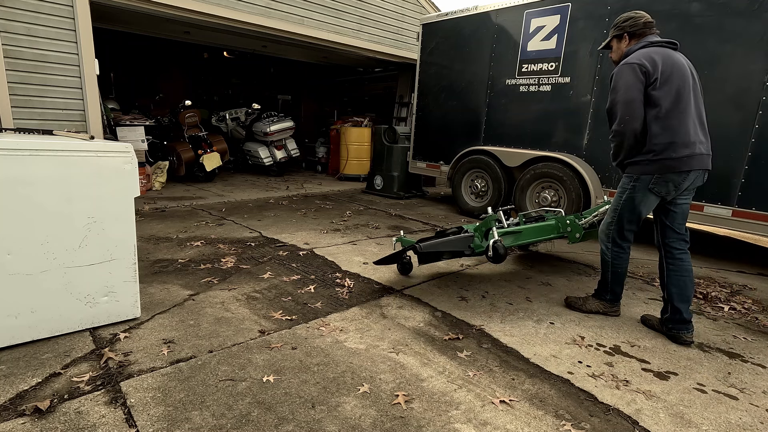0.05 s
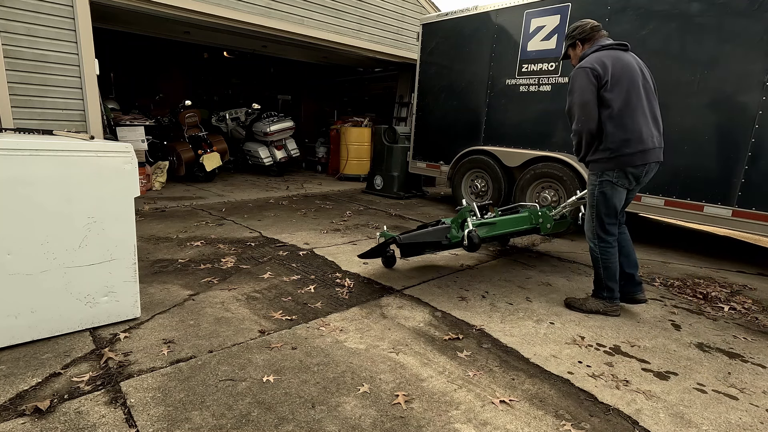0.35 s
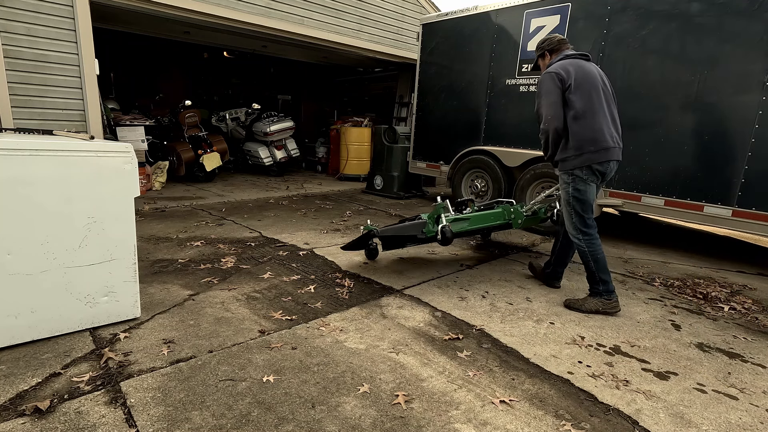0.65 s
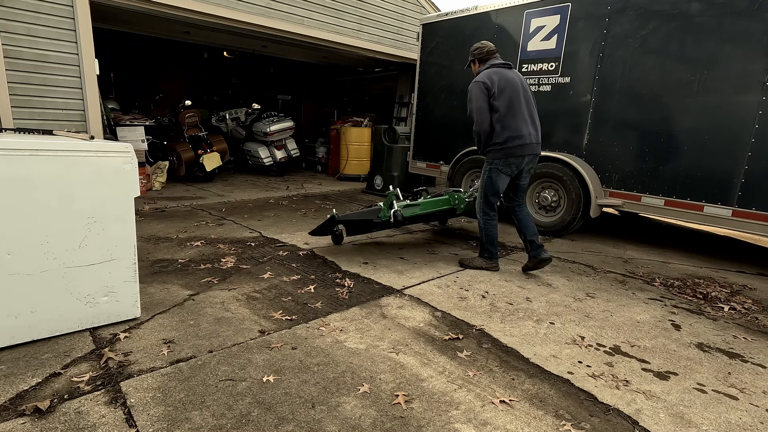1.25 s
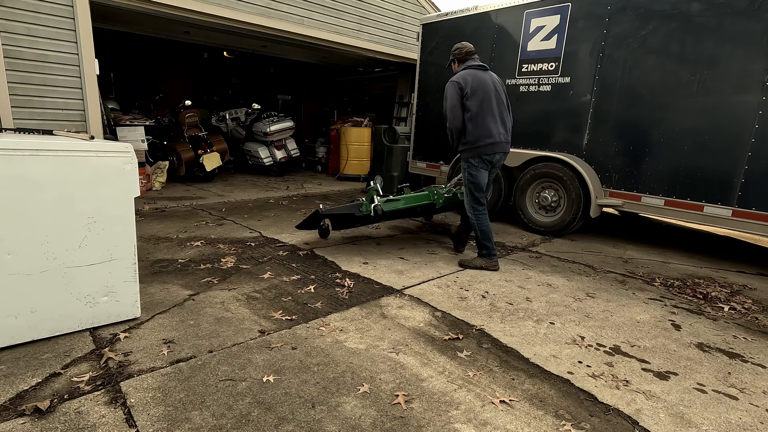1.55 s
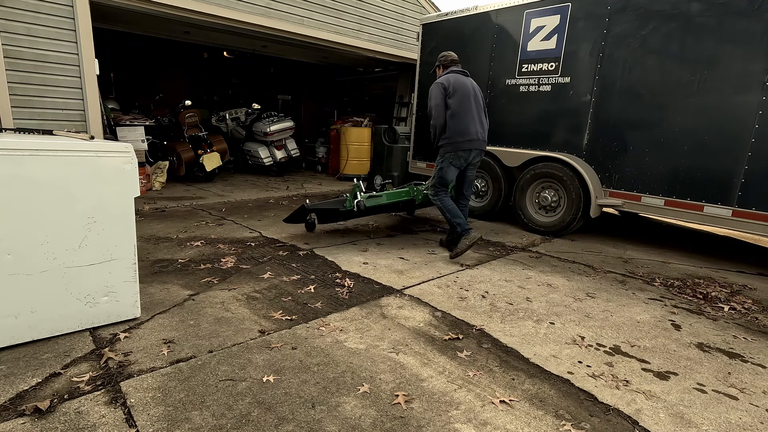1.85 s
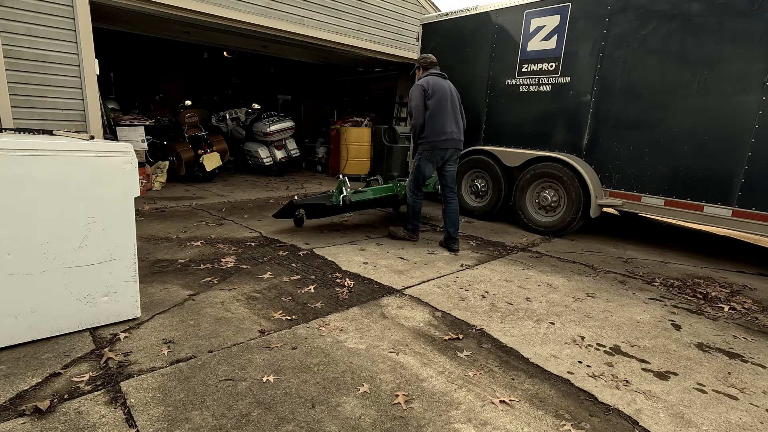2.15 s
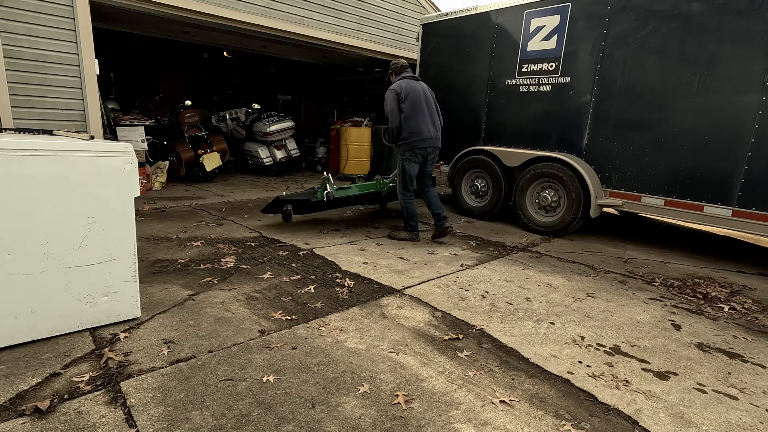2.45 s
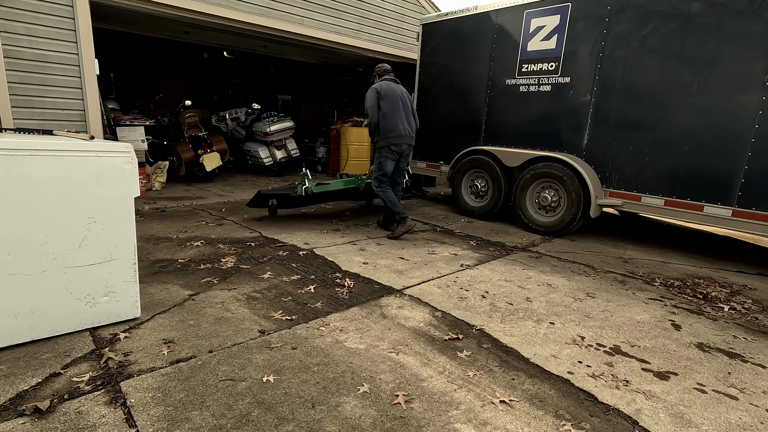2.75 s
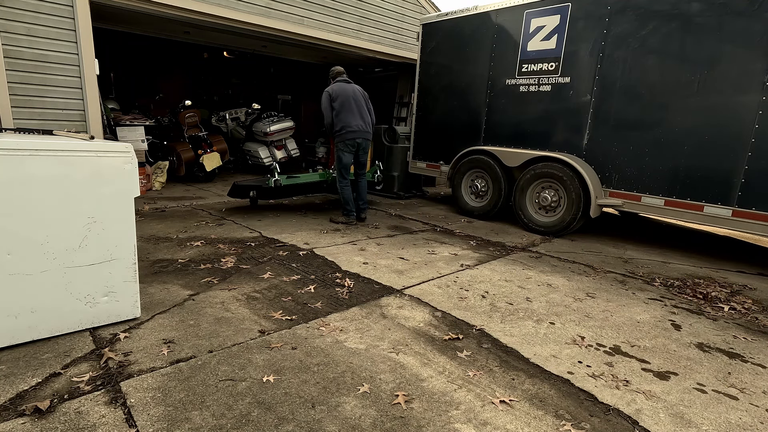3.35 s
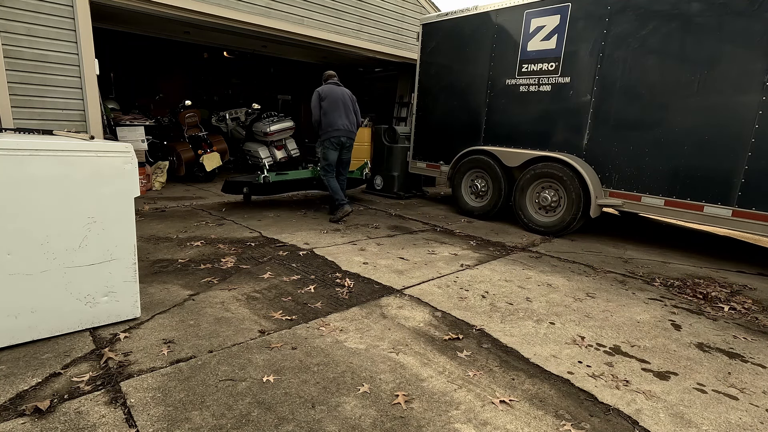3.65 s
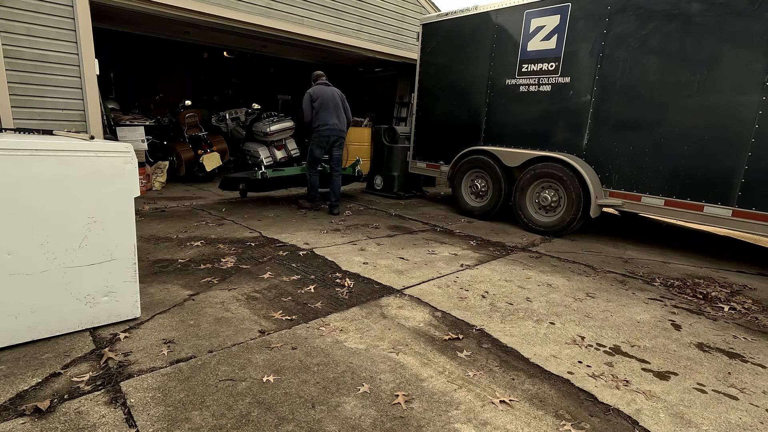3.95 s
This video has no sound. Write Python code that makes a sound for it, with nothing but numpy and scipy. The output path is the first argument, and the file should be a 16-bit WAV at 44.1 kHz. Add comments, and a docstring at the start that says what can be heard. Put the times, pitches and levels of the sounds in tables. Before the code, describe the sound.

A wheeled metal frame is pushed over rough concrete outside a garage. Loose parts knock, the wheels build to a rattling rumble with loud clatters at cracks, and shoes scuff lightly before one last heavy jolt, all with slight echo.

```python
"""A steel frame on small hard wheels is pushed over a rough concrete driveway into a garage.
Loose parts knock first; then grit under the wheels builds to a drumming that keeps the joints rattling.
Near 0.4, 1.4 and 1.85 s the wheels hit cracks and the whole frame clatters. A calmer stretch follows,
with knocks, wheel clonks and shoe scuffs, until a last heavy jolt at 3.9 s.
Throughout, the garage front answers, and a low hum and outdoor air lie underneath."""
import sys
import numpy as np
from scipy import signal
from scipy.fft import rfft, irfft, next_fast_len
from scipy.io import wavfile
from scipy.ndimage import map_coordinates

SR = 44100
rng = np.random.default_rng(int(sys.argv[2]) if len(sys.argv) > 2 else 0)


def waveform_to_disk(signal):
    """Save audio, clipped to [-1, 1], as 16-bit WAV at the path in sys.argv[1]."""
    frames = np.transpose(np.atleast_2d(signal))
    scaled = np.clip(frames, -1, 1) * 32767
    samples = np.round(scaled).astype(np.int16)
    wavfile.write(sys.argv[1], SR, samples)


N = 176400

# fader rides for the wheels' drumming and the rattling joints (t/s, level/dB)
ROLL_RIDE = [(0, -50), (.33, -38.5), (.55, -32.5), (.68, -26.5), (.88, -33), (.98, -32), (1.12, -37),
             (1.3, -28), (1.62, -31), (1.95, -29.5), (2.1, -32.5), (2.44, -34), (2.8, -31), (3.25, -31),
             (3.42, -33), (3.6, -31), (3.85, -34.5)]
RATTLE_RIDE = [(0, -38), (.34, -42), (.52, -38), (.72, -33.5), (.84, -35.5), (.9, -45.5), (1.05, -39),
               (1.11, -44.5), (1.21, -45), (1.3, -29), (1.58, -40.5), (1.74, -34), (1.97, -36),
               (2.13, -37.5), (2.58, -39), (2.8, -34), (3.0, -37.5), (3.35, -35.5), (3.42, -41.5),
               (3.55, -32), (3.72, -42), (3.84, -40.5)]
# wheels jolting through cracks (t/s, length/s, rumble/dB, relative clatter/dB)
CRACKS = [(0.389, 0.023, -21, -27), (0.434, 0.012, -20, -22.5), (0.462, 0.015, -30, -24),
          (0.476, 0.035, -22.5, -36), (0.592, 0.017, -20.5, -29), (0.721, 0.0053, -39, -26),
          (0.755, 0.013, -34, -38), (0.939, 0.028, -28, -33.5), (1.231, 0.043, -30, -30.5),
          (1.361, 0.01, -18, -26), (1.384, 0.018, -25, -14.5), (1.404, 0.048, -20, -20),
          (1.454, 0.042, -22.5, -21), (1.836, 0.019, -20.5, -20), (1.857, 0.017, -20, -16.5),
          (1.893, 0.033, -29, -31.5), (2.894, 0.062, -24.5, -36), (3.053, 0.036, -29, -38.5),
          (3.15, 0.01, -31.5, -27), (3.22, 0.039, -28.5, -35), (3.506, 0.03, -25, -36),
          (3.681, 0.037, -27, -33), (3.894, 0.034, -16.5, -19), (3.917, 0.029, -17.5, -16),
          (3.969, .04, -14, -15.5)]
# tone of the frame's deep voice (f/Hz, gain/dB)
FRAME_EQ = [(25, -23), (50, -51), (80, -10.5), (100, -9), (125, -2.5), (165, -7.5), (235, 2.5), (305, -6.5),
            (390, -2.5), (490, 3), (620, -5), (900, -9), (1400, -24.5), (3000, -72)]
# tone of the steel joints (f/Hz, gain/dB)
JOINT_EQ = [(200, -10.5), (600, -3.5), (1050, 0.5), (1450, 1.5), (1670, -3), (1900, -0.5), (2800, -0.5),
            (3700, -3.5), (4400, -9), (5500, -15), (7000, -21.5), (8200, -40), (10500, -31)]
# ringing modes of the frame, and of the small pins on it (f/Hz, relative level/dB, t60/s)
FRAME_MODES = [(230.7, 4.5, 0.066), (385.8, 9.5, 0.43), (540, 10, 0.42), (594.7, 9.5, 0.12),
               (751.5, 11, 0.069), (1035, 7, 0.3), (1307, 13, 0.18), (1645, 16, 0.096), (1720, 10, 0.084),
               (2167, 11, 0.26), (2300, -6, 0.2), (2523, 1, 0.073), (3800, -9, 0.064), (4060, 9, 0.044)]
PIN_MODES = [(1727, 3.5, 0.03), (1990, 4, 0.026), (2680, 2.5, 0.043), (2920, -22, 0.019),
             (3560, 0.5, 0.067), (3760, -9.5, 0.067), (6300, -36, 0.04)]
# decay of the noisy snap of one contact (f/Hz, t60/s)
CONTACT_DECAY = [(100, 0.06), (500, 0.052), (1500, 0.047), (6000, 0.034)]
# single knocks of loose parts (t/s, thud/dB, body/dB, clank/dB, tick/dB)
KNOCKS = [(.005, -40, -31.5, -28.5, -29), (.068, -27, -28, -22.5, -25), (.089, -59, -52, -29, -30),
          (0.155, -36, -36, -34.5, -29), (0.202, -29.5, -27, -26, -34), (.292, -23.5, -29.5, -29, -27.5),
          (0.378, -30, -19, -23, -29), (.504, -32, -23, -28, -49), (.594, -40, -35, -19.5, -25),
          (.761, -30, -18.5, -26, -31), (0.88, -27, -49, -54, -52), (0.962, -19, -25.5, -33.5, -31.5),
          (1.012, -26, -21, -28, -33), (1.035, -21.5, -26.5, -30.5, -34.5), (1.172, -23, -23, -28.5, -32),
          (1.316, -16.5, -21.5, -27, -27), (1.637, -45, -25, -28, -33), (1.68, -33, -26, -26, -25),
          (1.788, -34, -22, -25.5, -22), (1.981, -29, -23.5, -27.5, -61), (2.115, -34, -39, -31.5, -37),
          (2.211, -24.5, -21.5, -30.5, -37), (2.245, -39, -41, -28, -34), (2.296, -46, -25, -29, -31.5),
          (2.329, -48, -25.5, -27, -33), (2.537, -30, -26.5, -33, -54), (2.778, -27.5, -31, -27, -59),
          (2.892, -37, -35, -33, -35), (2.925, -38, -21, -29, -40), (3.059, -30, -27.5, -27, -32),
          (3.263, -21.5, -28, -37, -29.5), (3.357, -51, -36, -34, -35), (3.53, -37, -24, -41, -38),
          (3.9, -16, -19, -39, -49)]
# tone of a knock's thud, body and clank (f/Hz, gain/dB)
THUD_EQ = [(50, -34), (110, -6), (230, 13.5), (330, -9), (700, -19.5), (2000, -70)]
BODY_EQ = [(150, -40), (330, -13), (520, 1), (700, -4.5), (1100, -8), (3000, -60.5)]
CLANK_EQ = [(400, -35), (1000, -2), (1700, -3), (2800, -2.5), (4000, -16.5), (8000, -44)]
# tone of its tick (f/Hz, gain/dB)
TICK_EQ = [(1200, -37), (2700, -1), (3600, 3), (4500, -5), (6500, -14), (8200, -21), (10500, -9.5)]
# cues for the parts with notes of their own (t/s, relative level/dB)
JOINT_SLAMS = [(.393, -14.5), (.401, -13), (.431, -11.5), (.595, -24.5), (1.389, -21), (1.495, -22),
               (1.847, -23), (1.862, -11), (3.918, -16.5), (3.977, -17)]  # the frame slams on its joints at hard jolts
TUBE_BUMPS = [(1.362, -12.5), (1.392, -12)]  # its hollow tube is bumped
FORK_CLONKS = [(.203, -19), (.506, -23), (1.037, -24.5), (2.537, -23), (2.912, -31), (2.935, -23),
               (3.06, -18.5), (3.111, -24), (3.676, -30)]  # a wheel knocks in its fork
CLIP_CLINKS = [(1.68, -20.5), (1.789, -20)]  # a hanging clip hits the frame
# the notes of those parts (f/Hz, relative level/dB, t60/s)
JOINT_MODES = [(748, -4, 0.15), (998, -6.5, .12), (1215, -3.5, 0.071), (1688, -1.5, 0.11),
               (2055, -5, 0.074), (2600, -1, 0.054), (2924, -6.5, 0.075), (4450, -9, 0.065)]
TUBE_MODES = [(371.5, -1.5, 0.1), (446, -8.5, 0.12)]
FORK_MODES = [(612, 4.5, 0.051), (716, -7, 0.23)]
CLIP_MODES = [(3514, 0, 0.057), (3880, -9, 0.071), (6150, -8.5, 0.042)]
# shoes on the concrete (t/s, length/s, level/dB)
SCUFFS = [(.22, .06, -36), (0.426, 0.011, -25), (0.838, 0.063, -41.5), (0.936, 0.023, -38),
          (1.247, 0.03, -38), (1.28, .002, -32.5), (2.763, 0.057, -38), (3.153, 0.069, -34),
          (3.434, 0.16, -41)]
# tone of a sole (f/Hz, gain/dB)
SOLE_EQ = [(500, -57), (1500, -15), (3200, -1), (4500, 1), (6500, -3), (8000, -10), (10500, 2)]
# decay of the echo off garage and walls (f/Hz, t60/s)
YARD_DECAY = [(120, 1), (500, 0.35), (2000, 0.17), (7000, 0.27)]
# EQ on the echo's stereo side (f/Hz, gain/dB)
SIDE_EQ = [(25, -6), (60, -45), (250, -126), (1000, -21.5), (2500, -20), (5000, -16.5), (8000, -2.5)]
# tone of the outdoor air (f/Hz, gain/dB)
AIR_EQ = [(25, -8), (60, 1.5), (130, 0.5), (500, 0), (2000, -18), (6500, -23.5), (8200, -33),
          (10500, -20.5)]

GRIT_PER_S, RATTLES_PER_S, JOLTS_PER_S, TAPS_PER_PIN_PER_S = 320, 170, 260, 110
JOLT_ATTACK_S, JOLT_RELEASE_S = 0.003, 0.11
CONTACT_RISE_S, STRIKE_RISE_S = 0.00092, 0.00032
PIN_DETUNE, STRIKE_DETUNE = 0.025, 0.015  # fractions of the pitch
JINGLE_DB = -7  # against the rattle ride
KNOCK_S = 0.0076  # a knock's energy equals its level held this long
HUM_HZ, HUM_DB, AIR_DB = 121.2, -43.5, -36.5
LOW_CUT_HZ, TOP_HZ = 81, 11200


def rolling():
    """Grit drums through the wheels and shakes the joints and pins."""
    roll_level = amp(curve(ROLL_RIDE) + 1.4 * wobble(17))
    drumming = shaken(roll_level, GRIT_PER_S, FRAME_EQ, scatter_db=3.7, spots=12)
    rattle_db = curve(RATTLE_RIDE)
    rattle_level = amp(rattle_db + 0.36 * wobble(21.7))
    joints = shaken(rattle_level, RATTLES_PER_S, JOINT_EQ, scatter_db=2.9, spots=10)
    return drumming + joints + jingle(amp(rattle_db + JINGLE_DB))


def cracks():
    """A wheel drops into a crack: the frame rumbles, and its joints and pins chatter hard."""
    shapes = np.array([swell(s, length, JOLT_ATTACK_S, JOLT_RELEASE_S) for s, length, *_ in CRACKS])
    rumble, clatter = (np.max(amp(db)[:, None] * shapes, axis=0) for db in np.transpose(CRACKS)[2:])
    frame = shaken(rumble, JOLTS_PER_S, FRAME_EQ, scatter_db=3.34, spots=6)
    joints = shaken(clatter, JOLTS_PER_S, JOINT_EQ, scatter_db=1.5, spots=5)
    return frame + amp(-0.5) * joints + jingle(amp(-19) * clatter)


def shaken(level, rate, eq, scatter_db, spots):
    """Uneven hits, rate a second, land on several spots of the frame, each with its own ring."""
    slip, force = rng.standard_normal((2, 4000))
    at = ((np.arange(len(slip)) + .5 * slip) * SR / rate).astype(int)
    keep = (at >= 0) & (at < N)
    at = at[keep]
    force = unit(amp(scatter_db * np.clip(force[keep], -2, 2)))
    spot = rng.integers(spots, size=len(slip))[keep]
    out = np.zeros(N)
    for k in range(spots):
        ring = colour(contact(), eq)
        blows = np.bincount(at, force * level[at] * (spot == k), N)
        out += signal.fftconvolve(blows, ring / np.linalg.norm(ring))[:N]
    return out * np.sqrt(SR / rate)


def contact(ring_db=-3):
    """One hit on the frame: a short noisy snap and a longer metallic ring, new each time."""
    hit = noise_burst(CONTACT_DECAY, size=8192)
    t = np.arange(len(hit)) / SR
    for hz, db, t60 in FRAME_MODES:
        fade = np.log(1000) / t60
        gain = amp(db + ring_db) * 2 * np.sqrt(fade * len(FRAME_MODES)) / SR
        hit += gain * np.sin(2 * np.pi * (hz * t + rng.random())) * np.exp(-fade * t)
    return hit * (1 - np.exp(-t / CONTACT_RISE_S))


def jingle(level):
    """Small pins tap at random, each tap a short ping at a slightly different pitch."""
    t, out = np.arange(SR // 10) / SR, np.zeros(N + SR)
    for hz, db, t60 in PIN_MODES:
        starts = rng.integers(N, size=TAPS_PER_PIN_PER_S * N // SR)
        scatter = np.clip(rng.standard_normal((len(starts), 2)), -2, 1.5)
        for start, (detune, force) in zip(starts, scatter):
            ping = np.sin(2 * np.pi * hz * (1 + PIN_DETUNE * detune) * t)
            out[start:start + len(t)] += amp(db + 2 * force - 60 * t / t60) * ping
    return level * unit(out[:N])


def knocks():
    """Loose parts strike once, each with its own blend of thud, body, clank and tick."""
    out = np.zeros(N + SR)
    for s, *levels in KNOCKS:
        blow = contact()
        for db, eq in zip(levels, (THUD_EQ, BODY_EQ, CLANK_EQ, TICK_EQ)):
            ring = colour(blow, eq)
            out[int(s * SR):][:len(ring)] += amp(db) * ring / np.linalg.norm(ring)
    return out[:N] * np.sqrt(KNOCK_S * SR)


def ringing_parts():
    """Pitched accents: steel joints, tube, wheel fork and clip each ring their own notes when hit."""
    return (amp(-5.5) * strike(JOINT_SLAMS, JOINT_MODES) + strike(TUBE_BUMPS, TUBE_MODES)
            + strike(FORK_CLONKS, FORK_MODES) + strike(CLIP_CLINKS, CLIP_MODES))


def strike(blows, modes):
    """Blows ring a loose part, which sits, and so sounds, a little differently every time."""
    t, out = np.arange(SR // 3) / SR, np.zeros(N + SR)
    for s, level in blows:
        pitch = 1 + STRIKE_DETUNE * rng.uniform(-0.82, 1)
        ring = np.zeros(len(t))
        for hz, db, t60 in modes:
            decay = amp(db + rng.normal() - 60 * t / t60)
            ring += decay * np.sin(2 * np.pi * (pitch * hz * t + rng.random()))
        out[int(s * SR):][:len(t)] += amp(level) * ring * (1 - np.exp(-t / STRIKE_RISE_S))
    return out[:N]


def scuffs():
    """Soles grind loose sand in short, grainy swishes."""
    level = sum(amp(db) * swell(s, length, attack=0.013, release=0.086) for s, length, db in SCUFFS)
    sand = rng.standard_normal(N) * amp(4 * wobble(250))
    return level * unit(colour(sand, SOLE_EQ))


def yard_echo(direct):
    """Garage front and walls throw back a short, diffuse tail."""
    tail = np.pad(noise_burst(YARD_DECAY, size=22050), (400, 0))  # 9 ms pre-delay
    return signal.fftconvolve(direct, tail)[:N]


def background():
    """The bed: a wavering low hum and faint outdoor air."""
    phase = 2 * np.pi * np.cumsum(HUM_HZ + 3 * wobble(16)) / SR
    air = unit(colour(rng.standard_normal(N), AIR_EQ))
    hum = unit(np.sin(phase) * amp(1.54 * wobble(19)))
    return amp(HUM_DB) * hum + amp(AIR_DB) * air


def amp(db):
    """Decibels to gain."""
    return 10 ** (np.asarray(db) / 20)


def unit(x):
    """Scale to rms 1."""
    return x / np.sqrt(np.mean(x ** 2) + 1e-20)


def along(points, hz):
    """Read (f/Hz, value) points on a log frequency axis."""
    f, values = np.transpose(points)
    return np.interp(np.log(hz + 1), np.log(f + 1), values)


def curve(rows):
    """Join (t/s, value) points, one value per sample."""
    return np.interp(np.arange(N) / SR, *np.transpose(rows))


def wobble(rate):
    """Smooth random modulation, rate knots a second."""
    return map_coordinates(rng.standard_normal(1024), [np.arange(N) * rate / SR], mode="wrap")


def swell(start, length, attack, release):
    """Envelope: ramp up to start, hold for length, then fall 60 dB per release time."""
    t = np.arange(N) / SR - start
    return np.clip(t / attack + 1, 0, 1) * amp(-60 * np.maximum(t - length, 0) / release)


def colour(x, eq):
    """Minimum-phase EQ through (f/Hz, gain/dB) points: nothing rings ahead of a hit."""
    n = x.shape[-1]
    m = 2 * next_fast_len(n // 2 + 4096)
    cepstrum = irfft(np.log(amp(along(eq, np.fft.rfftfreq(m, 1 / SR)))))
    cepstrum[1:m // 2] *= 2
    cepstrum[m // 2 + 1:] = 0
    return irfft(rfft(x, m) * np.exp(rfft(cepstrum)), m)[..., :n]


def noise_burst(t60s, size):
    """A burst of noise of energy 1, each frequency fading at its own speed."""
    hz, t, spectra = signal.stft(rng.standard_normal(size), SR, nperseg=128)
    decay = amp(-60 * t / along(t60s, hz)[:, None])
    burst = signal.istft(spectra * decay, SR, nperseg=128)[1][:size]
    return burst / np.linalg.norm(burst)


def scene():
    """Frame, shoes and bed sit in the centre; a second echo on the sides adds width."""
    direct = rolling() + cracks() + knocks() + ringing_parts() + scuffs()
    echo, wide = yard_echo(direct), yard_echo(direct)
    mid = direct + amp(-11) * echo + background()
    side = colour(wide, SIDE_EQ)
    return np.array([mid + side, mid - side]) * amp([[-.25], [.25]])


def record(dry):
    """Deep bass is cut, and the treble is dulled above 7 kHz and ends near 11 kHz."""
    m = next_fast_len(N + SR // 2)
    hz = np.fft.rfftfreq(m, 1 / SR)
    low_cut = hz ** 2 / np.hypot(hz ** 2, LOW_CUT_HZ ** 2)
    high_shelf = amp(along([(7300, 0), (8300, -18.5)], hz))
    return irfft(rfft(dry, m) * low_cut * high_shelf * (hz < TOP_HZ), m)[:, :N]


dry = scene()
out = record(dry)
waveform_to_disk(out)
```